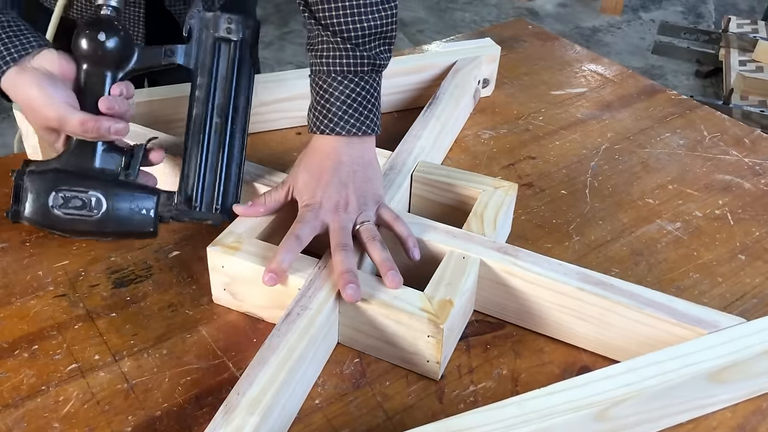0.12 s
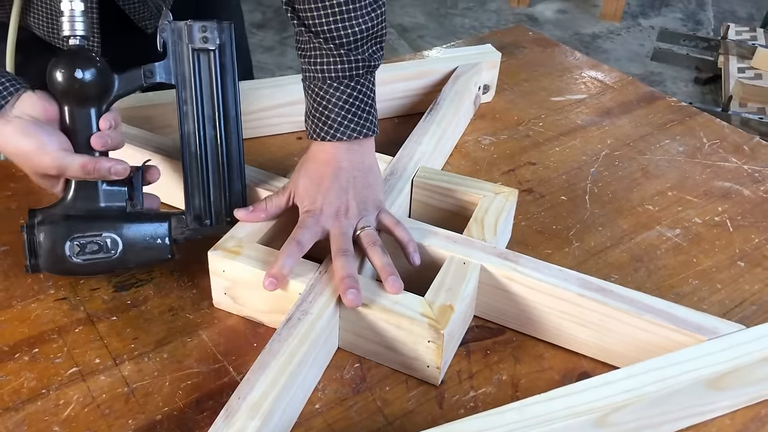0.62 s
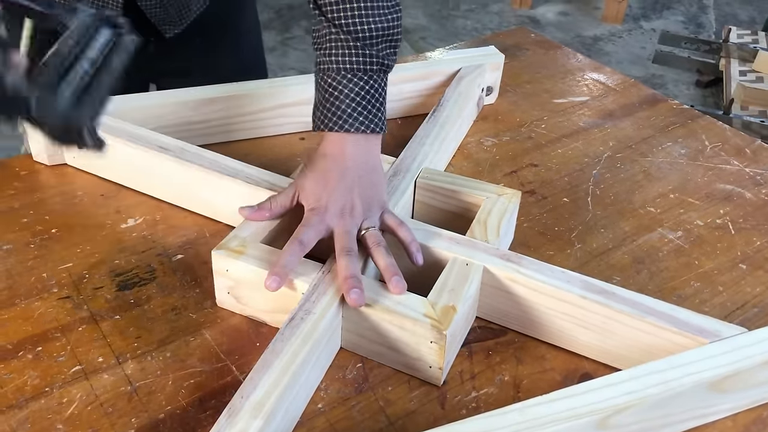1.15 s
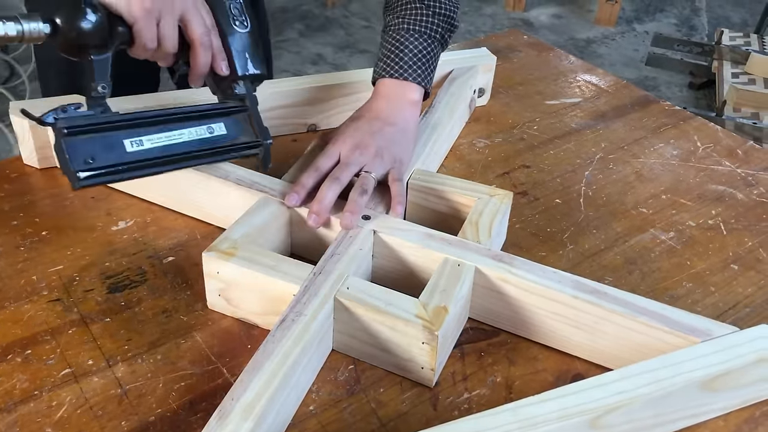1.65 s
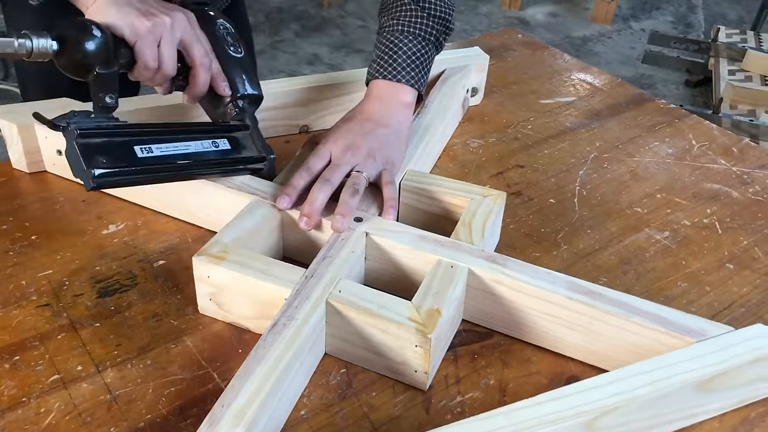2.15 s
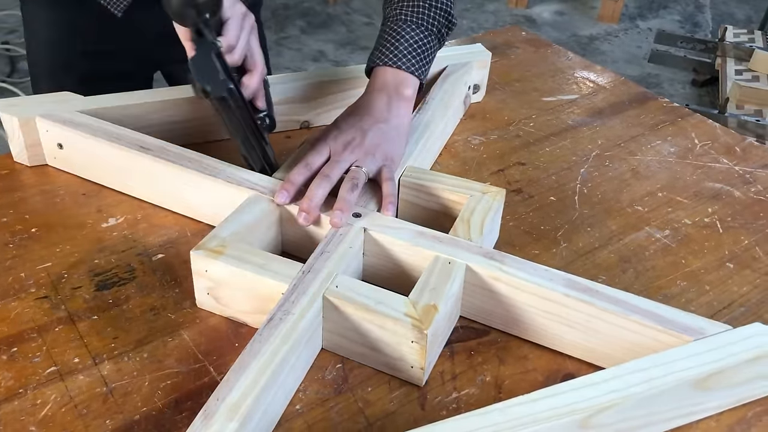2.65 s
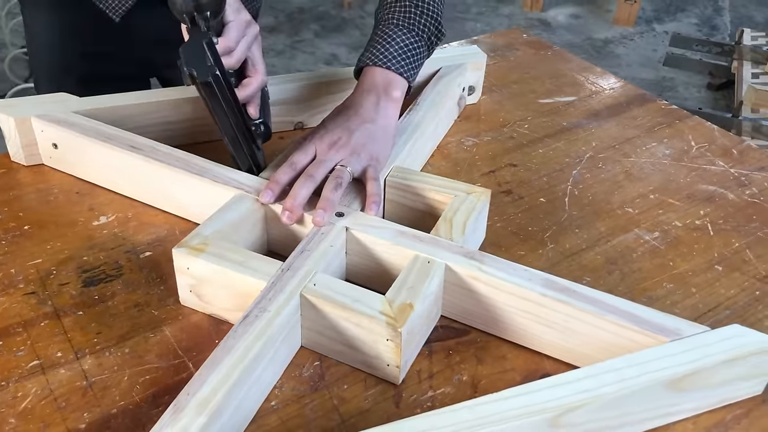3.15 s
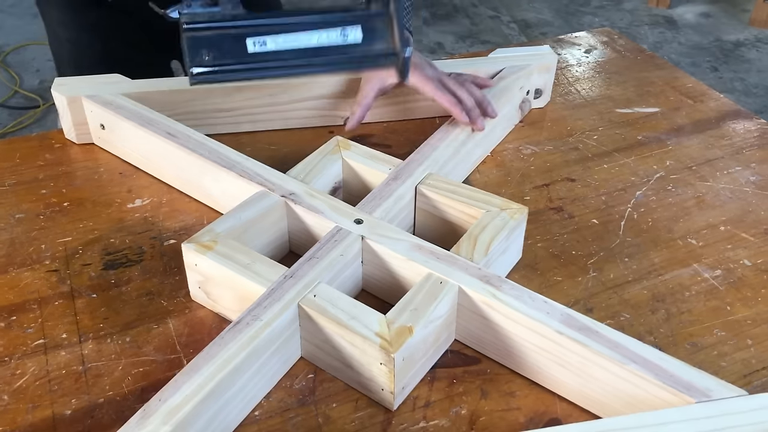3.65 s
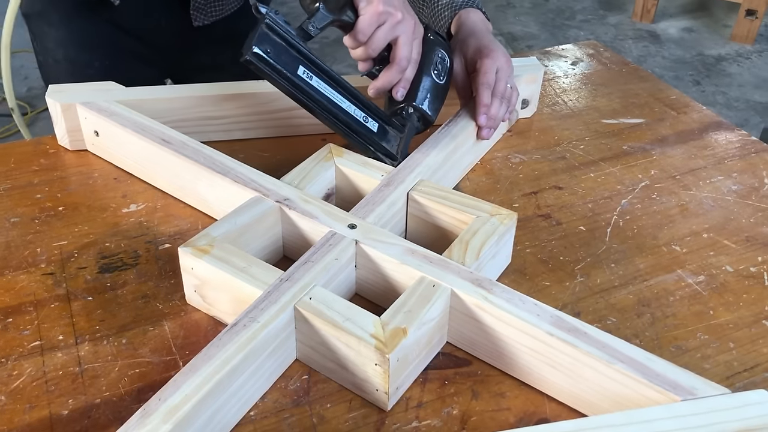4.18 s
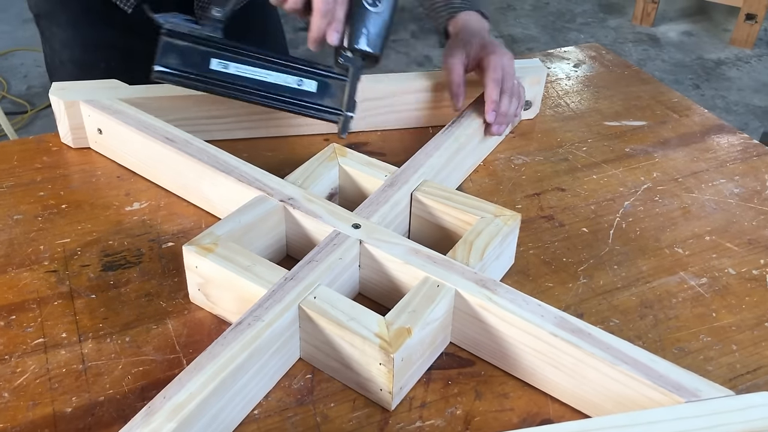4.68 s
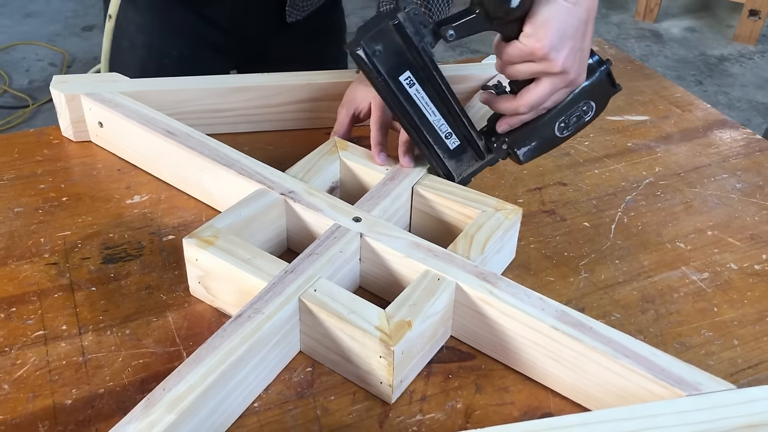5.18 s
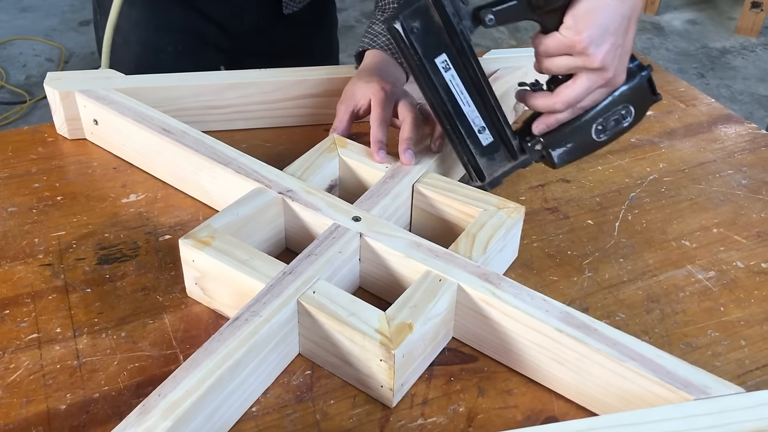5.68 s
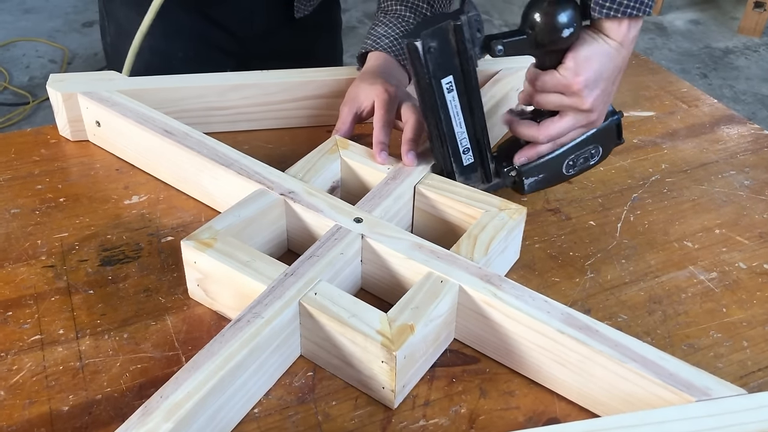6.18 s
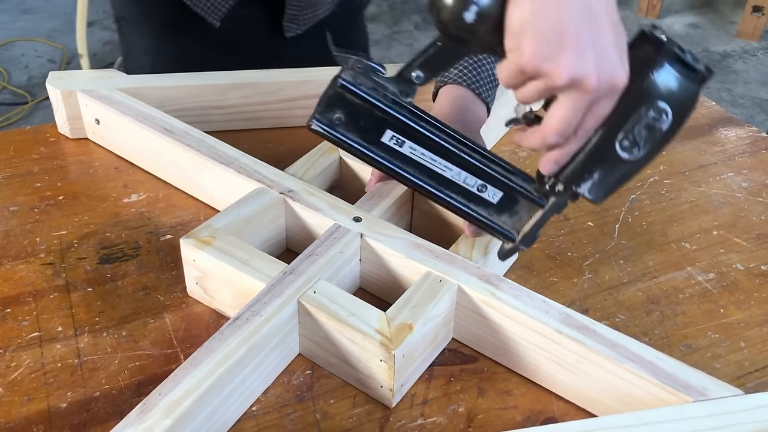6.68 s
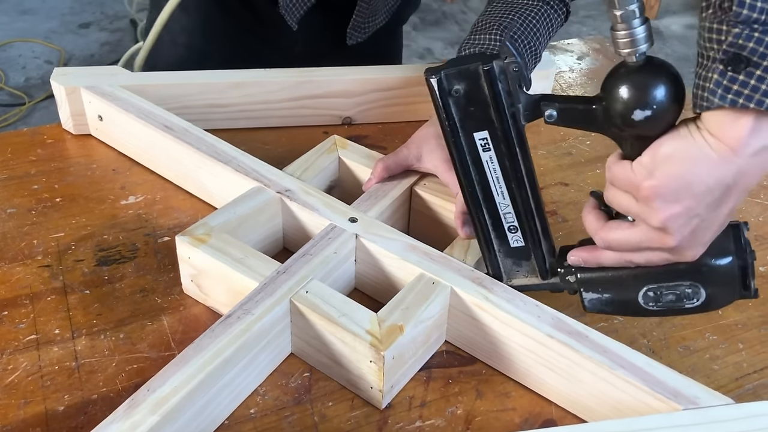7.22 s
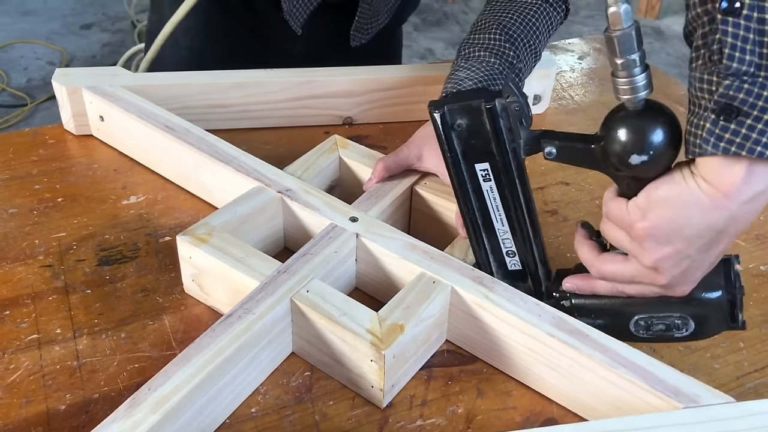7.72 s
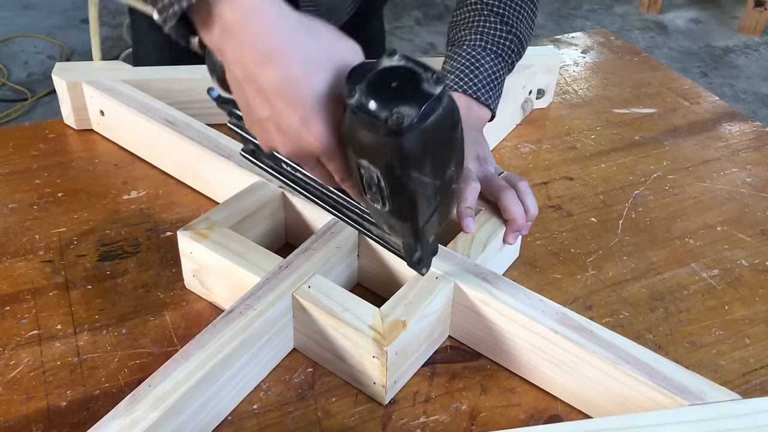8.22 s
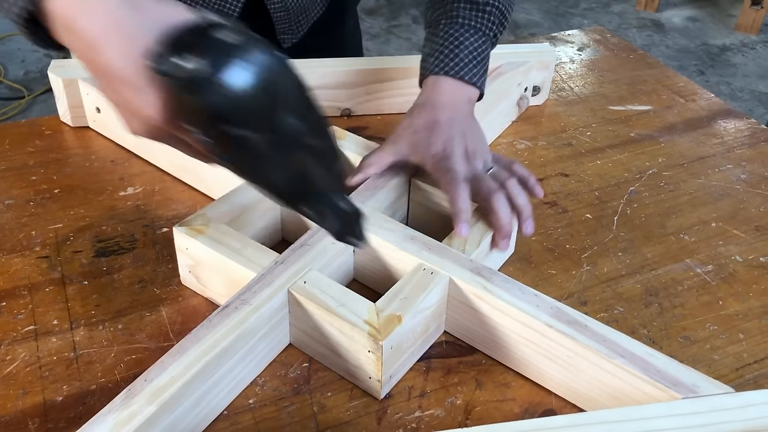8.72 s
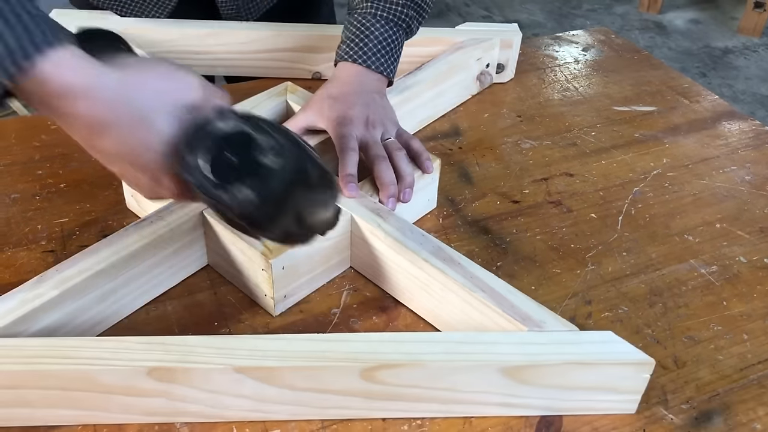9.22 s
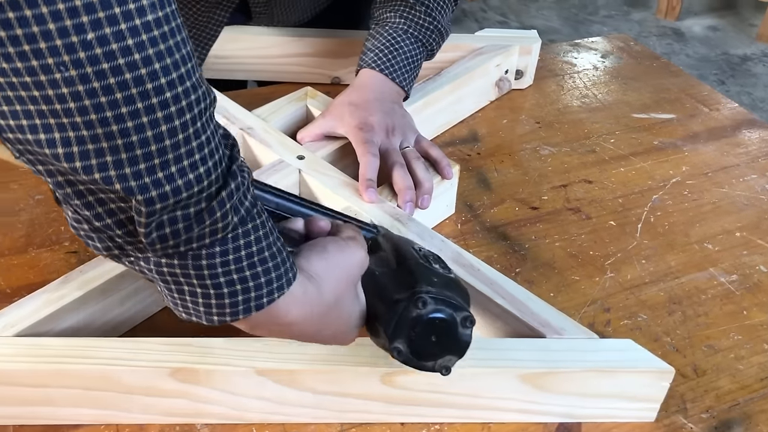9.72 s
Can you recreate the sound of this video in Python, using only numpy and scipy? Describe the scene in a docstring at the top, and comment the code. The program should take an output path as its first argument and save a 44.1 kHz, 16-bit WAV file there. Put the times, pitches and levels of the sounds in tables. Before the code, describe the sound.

Close to the microphone, an air nailer drives brads into a pine frame: each shot is a hard metallic crack with a burst of air, then a short exhaust puff. Between shots the gun clacks on wood and the frame thumps and slides on the bench. Distant bangs come around the middle. A large shed gives a short echo over a faint rustling background.

```python
"""Air nailer at a workshop bench

Near at hand, an air nailer drives brads into a pine frame: valve and exhaust blow shaped turbulent noise,
while steel, pine and bench answer each blow as sums of decaying modes.
Gun and frame knock and slide between shots, someone bangs further off, and there are ticks and tinkles.
A hall echoes by convolution with decaying noise, above a wavering shop background and a faint whine."""
import sys
import numpy as np
from scipy import signal
from scipy.fft import rfft, irfft
from scipy.io import wavfile
from scipy.ndimage import uniform_filter1d

SR = 44100
rng = np.random.default_rng(int(sys.argv[2]) if len(sys.argv) > 2 else 0)


def store_wav(level_fs):
    """Save 16-bit WAV to argv[1]."""
    pcm = np.round(np.clip(np.atleast_2d(level_fs), -1, 1) * 32767)
    wavfile.write(sys.argv[1], SR, pcm.T.astype(np.int16))


def volts_from_db(level):
    """Convert decibel levels to linear amplitude ratios."""
    exponent = np.asarray(level, float) / 20
    return 10 ** exponent


N = 434826
LEAD = 4096  # samples ahead of t = 0, for sounds that have already begun
PLACES = 5  # positions of the work, each with its own echo

# shots: faint hiss begins t/s, valve opens t/s, valve shuts t/s, air level/dB, hall level/dB, chatter level/dB
SHOTS = [(-.058, -.033, -.017, -28, 0, -33), (.847, .871, .890, -25, -1, -31),
         (2.190, 2.220, 2.236, -21.5, 0, -29), (3.256, 3.278, 3.294, -24.5, 2, -29.5),
         (4.476, 4.504, 4.524, -24, 1.5, -30.5), (5.588, 5.620, 5.633, -20, -3, -28.5),
         (6.183, 6.198, 6.210, -25, 2, -27), (7.226, 7.256, 7.266, -19.5, -5.5, -35),
         (7.845, 7.859, 7.880, -24, 1, -29.5), (8.591, 8.610, 8.622, -25.5, 1, -31.5)]
# exhaust port, venting as the piston returns:
# opens t/s, shuts t/s, level/dB, rise/ms, after-blow level/dB, after-blow fall/ms
EXHAUSTS = [(.052, .070, -18.5, 2, -5, 24), (.974, .996, -19.5, 8, -2.5, 25),
            (2.319, 2.337, -17, 2, -5, 26), (3.379, 3.402, -25, 3, 0, 20), (3.411, 3.421, -23, 2, -7, 18),
            (4.594, 4.611, -19.5, 1.5, -5.5, 17), (5.697, 5.712, -22, 5, -3.5, 15),
            (6.273, 6.285, -18, 2, -7, 14), (7.344, 7.361, -22, 8, -4, 18), (7.941, 7.956, -22, 3, -1, 14),
            (8.693, 8.712, -20, 2.5, -8, 14)]
# spectrum of the bright air jet: f/Hz, density level/dB per Hz
AIR_COLOUR = [(70, -42.5), (165, 0.5), (400, -4.5), (900, -10), (1700, -8), (4300, -6), (9000, -1),
              (15000, 3.5), (17000, -3)]
# driver hitting the brad, and gun rebounding: t/s, level/dB, relative crack level/dB
STRIKES = [(-.018, -20, -3), (.888, -9, -4), (.891, -18, 4), (.900, -19, -3), (2.230, -14, 6),
           (2.235, -16, 3), (3.294, -18, -7), (3.300, -18, 8), (3.318, -20, -5), (4.520, -15, -2),
           (4.539, -20, -10), (4.552, -16, -3), (5.626, -22, 7), (5.660, -22, -8), (6.213, -17, 5),
           (7.263, -27, 3), (7.275, -15, -3), (7.878, -19, 3.5), (7.898, -17, 3), (8.629, -13, 3)]
# modes of gun body and frame: f/Hz, level/dB, t60/s
GUN_MODES = [(205, -8, 0.027), (322, -14.5, .04), (885.6, -2, 0.054), (950, 5.5, 0.0086),
             (1144, 5.5, 0.011), (1460, -2.5, 0.044), (1653, 9.5, 0.0081), (1980, 6, 0.0075),
             (2660, -22, .012), (4112, 8.5, 0.004), (5300, -1, .015), (6480, -23, .012)]
# thumps of frame and hands on the bench: t/s, peak level/dB, pitch ratio
KNOCKS = [(.404, -44, .8), (1.268, -59, 1.01), (1.722, -31, .98), (1.906, -27, 1.08), (1.975, -38, 1.01),
          (2.487, -40, 1.23), (2.752, -33, 1.2), (2.969, -32.5, .76), (3.892, -41, 1.03),
          (4.084, -30.5, 1.3), (4.125, -33, 1.4), (5.133, -31.5, 1.06), (5.403, -35.5, 1.04),
          (6.697, -37.5, 1.01), (6.875, -32, .99), (6.947, -31.5, 1.01), (7.507, -38.5, 1.01),
          (8.376, -31, .89), (8.945, -49, 1.01), (8.975, -43, 1.01), (9.030, -31, .91), (9.054, -29, 1.01),
          (9.071, -26, 1.01), (9.100, -34, 1.01), (9.130, -38, 1.01), (9.293, -31, 1.1), (9.328, -33, 1.1),
          (9.501, -28, .96), (9.783, -36.5, 1.06)]
# modes of the bench top: f/Hz, level/dB, t60/s
BENCH_MODES = [(88, -12, .12), (112, -5.5, 0.06), (149, 4.5, 0.13), (173, -1, 0.033), (202.7, -0.5, 0.079),
               (258, 2, 0.13), (333, 2, .05)]
# clacks of the gun against the frame: t/s, peak level/dB, contact/ms, pitch ratio
CLACKS = [(1.502, -35, .1, 1.5), (1.53, -48, .3, .84), (1.572, -37, .19, 2.1), (1.906, -37.5, .22, 1.23),
          (2.488, -41.5, .28, .92), (2.755, -17.5, .15, .95), (2.972, -42, .3, 1.3), (3.67, -45, .3, .99),
          (3.893, -41, .4, .95), (4.085, -32, .6, 1.2), (4.128, -32, 1.1, .7), (4.159, -35, 1.1, .7),
          (5.138, -31.5, .41, .76), (5.4, -37.5, .33, 1.28), (6.874, -38, .26, 1.2), (6.947, -34, .2, 1.15),
          (8.299, -51, .3, 1.2), (8.378, -45, .3, .9), (8.981, -45, .6, 1.01), (9.032, -39, .8, .9),
          (9.093, -39.5, .5, .9), (9.251, -48.5, .3, 1.01), (9.501, -43, .34, .82), (9.784, -39.5, .3, .85)]
# modes of the pine frame: f/Hz, level/dB, t60/s
FRAME_MODES = [(360, -10.5, .025), (516, 2, .03), (630, 4.5, 0.043), (740, -1, 0.043), (811, -3, .025),
               (1014, -0.5, 0.019), (1290, -1, .025), (1646, -4, .02), (1950, -6.5, 0.015),
               (2500, -8.5, 0.013), (3653, -12, 0.008)]
# decay of the hall: f/Hz, t60/s
HALL_T60 = [(60, .5), (250, 0.21), (1000, 0.36), (4000, 0.26), (14000, 0.15)]
# shop background: t/s, rumble level/dB, rustle level/dB, hiss level/dB
SHOP = [(.3, -76, -78, -85), (.8, -67, -74, -80), (1.2, -78, -75, -81), (1.7, -67, -72, -75),
        (2.15, -60, -67.5, -72), (2.5, -62, -72, -78), (2.65, -66, -80, -85), (3.2, -62, -66, -73),
        (3.75, -71, -74, -86), (4.0, -73, -78, -83), (4.45, -64, -72, -72), (4.85, -72, -72, -78),
        (5.3, -61, -72, -78), (5.8, -76, -68, -80), (6.05, -66, -65, -72), (6.45, -74, -66, -76),
        (7.1, -61, -67, -77), (7.55, -70, -70, -85), (8.25, -64, -73, -85), (8.55, -62, -71, -76),
        (8.85, -76, -72, -90), (9.3, -66, -68, -73), (9.65, -61, -64, -79)]
# wood and gun sliding over bench and frame:
# start t/s, loudest t/s, fade/s, rumble level/dB, rustle level/dB, hiss level/dB
SLIDES = [(.41, .44, .06, -68, -70, -80), (1.33, 1.36, .1, -78, -64, -66), (1.48, 1.52, .06, -75, -60, -70),
          (2.74, 2.76, .08, -68, -60, -64), (2.92, 3.0, .12, -62, -60, -68),
          (3.68, 3.72, .03, -62, -80, -90), (4.07, 4.10, .08, -55, -60, -68),
          (4.17, 4.24, .09, -56, -60, -68), (6.86, 6.93, .06, -51, -57, -74),
          (7.56, 7.74, .1, -66, -59, -61), (7.76, 7.85, .03, -64, -58, -55),
          (8.36, 8.42, .05, -66, -62, -74), (8.95, 9.07, .07, -55, -55, -65),
          (9.425, 9.46, .06, -62, -46, -62), (9.72, 9.78, .15, -57, -54, -70)]
# spectra of the three background bands: f/Hz, density level/dB per Hz
RUMBLE = [(25, -18), (60, -5.5), (120, -2), (200, -2.5), (400, -14), (700, -43)]
RUSTLE = [(200, -35.5), (450, -2), (800, -1), (1500, -6.5), (2200, -11), (4500, -36)]
HISS = [(1500, -30.5), (2600, 6), (5000, -1), (9000, -5), (15000, -8.5), (17000, -16)]
# blows further off in the hall: t/s, level/dB, fall/ms, relative treble level/dB
FAR = [(.698, -57, 14, 5), (1.338, -49, 16, -14), (1.632, -53, 14, 2.5), (3.621, -49, 14, -6),
       (4.424, -54, 9, -3), (4.941, -50, 28, -2), (5.094, -35, 18, -4), (5.375, -46, 14, -30),
       (5.902, -31, 13, 1.5), (6.099, -26.5, 30, -3), (6.523, -30.5, 24, -2.5), (6.698, -22, 16.8, -3.5)]
# spectrum of their body: f/Hz, density level/dB per Hz
FAR_COLOUR = [(100, -15), (300, -6), (750, 2), (1800, 2.5), (2800, -4), (5000, -19), (16000, -23)]
# single notes that ring briefly, of wood or small parts:
# t/s, f/Hz before a common pitch ratio, starting level/dB, t60/s
TINKLES = [(.700, 2050, -60, .05), (1.343, 3750, -59, .19), (1.343, 4250, -62, .2), (1.385, 2550, -59, .2),
           (4.128, 1000, -40, .11), (4.159, 1040, -42, .11), (2.40, 2520, -54, .3)]
# dry little ticks: t/s, peak level/dB
TICKS = [(1.5723, -58), (1.9051, -59.5), (2.0662, -40.5), (2.7562, -28.5), (7.1202, -55), (9.2509, -54)]
# faint whine that climbs: t/s, f/Hz, level/dB
WHINE = [(5.199, 1230, -83), (5.279, 1272, -72.5), (5.37, 1302, -60), (5.449, 1380, -84), (5.55, 1390, -65),
         (5.62, 1400, -85.5)]
# brief dip of the level: start t/s, end t/s, gain/dB
LEVEL_DIP = (3.599, 3.621, -20.5)

# parts of a shot: rise/ms, fall/ms, relative dull level/dB, hall level/dB
LEAD_HISS, OPENING, LEAK = (9, 80, -8, -9), (9, 15, -9, -9), (3.5, 15, -18, 2)
ECHO_SWELL = (16, 30, -5, -6)
INLET = (4.5, 22, -7)  # each shot gives the hall level
VENT = (14, -13, -5)  # each exhaust gives the rise
AFTER_BLOW = (13, -7, -12)  # each exhaust gives the fall
LEAD_HISS_DB, LEAD_HISS_DB_PER_MS = -37, -.45  # a longer lead-in is fainter
OPENING_DB, LEAK_DB, LEAK_LEAD_S = -16, -10, .010  # valve and port leak a little before they open
SHUT_MS = 3.0  # time constant of a closing valve or port
ECHO_SWELL_DB = -4.5  # noise swell that carries part of the echo after each inlet
RECOIL_DB, FRAME_DB = -17, -14  # bench and frame under a strike, relative to it
RETURN_DB, RETURN_LAG_S = -14, .008  # thump of the returning piston, relative to the exhaust
CHATTER_RISE_MS, CHATTER_FALL_MS, FAR_CHATTER_DB = 14, 32, -23
STRIKE_HALL_DB, KNOCK_HALL_DB, CLACK_HALL_DB, FAR_HALL_DB = -3, -5.5, -12, -1.5
KNOCK_CONTACT_MS = 2.4
HALL_GAP_S, HALL_RISE_S = 0.014, 0.011
NEAR_SHARE = 0.45  # gain for echoes of near things, before the walls answer
SIDE_DB = -19.5


def colour(count, points):
    """Spectral shaping: white noise filtered to (Hz, dB) points and scaled to rms 1."""
    hz, db = np.transpose(points)
    f = np.maximum(np.arange(count // 2 + 1) * SR / count, 1)
    gain = volts_from_db(np.interp(np.log(f), np.log(hz), db, left=-90))
    x = irfft(rfft(rng.standard_normal(count)) * gain, count)
    return x / x.std()


def flicker(rate, depth_db):
    """Random amplitude modulation: the gain in dB glides between random levels, rate of them a second."""
    k = int(SR / rate)
    steps = np.repeat(rng.standard_normal((N + LEAD) // k + 1), k)[:N + LEAD]
    return volts_from_db(depth_db * uniform_filter1d(steps, k))


def lines():
    """Superposition buses: an empty direct line, and a hall line for each place the work moves to."""
    return np.zeros((1 + PLACES, N + LEAD))


def add(bus, s, sound, hall_db):
    """Superposition: adds a sound to the direct line and, at hall_db, to the hall line of its place."""
    i = int(round(s * SR)) + LEAD
    sound = sound[:bus.shape[1] - i]
    place = int(s * 3 + 1) % PLACES  # moves on three times a second
    bus[0, i:i + len(sound)] += sound
    bus[1 + place, i:i + len(sound)] += sound * volts_from_db(hall_db)


def swell(rise_ms, fall_ms):
    """Transient envelope: quadratic rise, then exponential relaxation."""
    ms = np.arange(int(.2 * SR)) * 1000 / SR
    rise = np.minimum(ms / max(rise_ms, .1), 1) ** 2
    return rise * np.exp(-np.maximum(ms - rise_ms, 0) / max(fall_ms, .3))


def ring(modes, share, scatter_db):
    """Modal superposition: decaying sines whose strengths scatter by the given dB."""
    hz, db, t60 = np.transpose(modes)[:, :, None]
    t = np.arange(int(.3 * SR)) / SR
    # above 800 Hz neighbouring modes start in opposite sense
    sense = np.where(hz > 800, (-1) ** np.arange(len(modes))[:, None], 1)
    decay = volts_from_db(db + scatter_db[:, None] - 60 * t / t60)
    return np.sum(sense * decay * np.sin(2 * np.pi * hz * share * t), axis=0)


def peak(x, db):
    """Linear scaling of a sound to a peak level."""
    return x * volts_from_db(db) / np.abs(x).max()


def blows(table, modes, scatter_db):
    """Impact excitation: a half-sine push drives the modes; a longer, softer contact sounds duller."""
    bus = lines()
    # each blow lands elsewhere, so the strengths of its modes differ
    chance = rng.standard_normal((len(table), len(modes)))
    for (s, db, contact_ms, share, hall_db), c in zip(table, chance):
        push = np.sin(np.linspace(0, np.pi, int(np.clip(contact_ms, .05, 8) * SR / 1000) + 3))
        blow = signal.fftconvolve(ring(modes, share, scatter_db * c), push)
        add(bus, s, peak(blow, db), hall_db)
    return bus


def bursts():
    """Gated noise: faint lead-in, valve opening, inlet, echo swell; exhaust leak, vent, after-blow."""
    for lead_s, open_s, shut_s, db, hall_db, _ in SHOTS:
        lead_ms = 1000 * (open_s - lead_s)
        yield lead_s, open_s, LEAD_HISS_DB + LEAD_HISS_DB_PER_MS * lead_ms, LEAD_HISS
        yield open_s - LEAK_LEAD_S, open_s, db + OPENING_DB, OPENING
        yield open_s, shut_s, db, (*INLET, hall_db)
        yield shut_s, np.inf, db + hall_db + ECHO_SWELL_DB, ECHO_SWELL
    for open_s, shut_s, db, rise_ms, after_db, fall_ms in EXHAUSTS:
        yield open_s - LEAK_LEAD_S, open_s, db + LEAK_DB, LEAK
        yield open_s, shut_s, db, (rise_ms, *VENT)
        yield shut_s, np.inf, db + after_db, (AFTER_BLOW[0], fall_ms, *AFTER_BLOW[1:])


def air():
    """Turbulent jet noise: a bright hiss and a duller, slower-falling part, spitting unevenly."""
    bright, dull = lines(), lines()
    ms = np.arange(int(.2 * SR)) * 1000 / SR
    for s, end_s, db, (rise_ms, fall_ms, dull_db, hall_db) in bursts():
        shut = np.exp(-np.maximum(ms - 1000 * (end_s - s), 0) / SHUT_MS)
        add(bright, s, volts_from_db(db) * shut * swell(rise_ms, fall_ms), hall_db)
        add(dull, s, volts_from_db(db + dull_db) * shut * swell(rise_ms, 1.3 * fall_ms), hall_db)
    spit = flicker(700, 3.5)
    dull_colour = [(300, -11), (1000, -3), (2800, -3.5), (7000, -6), (12000, -21.5)]
    return spit * (bright * colour(N + LEAD, AIR_COLOUR) + dull * colour(N + LEAD, dull_colour))


def strikes():
    """Impact of steel on steel: the body's modes ring briefly under a broadband crack."""
    bus = lines()
    chance = rng.standard_normal((len(STRIKES), len(GUN_MODES) + 1))
    cracks = rng.standard_normal((len(STRIKES), int(.2 * SR)))
    for (s, db, crack_db), c, crack in zip(STRIKES, chance, cracks):
        body = ring(GUN_MODES, 1 + .015 * c[0], 3.0 * c[1:])
        add(bus, s, peak(body, db), STRIKE_HALL_DB)
        add(bus, s, volts_from_db(db + crack_db - 6) * crack * swell(.2, .8), STRIKE_HALL_DB - 3)
    return bus


def bench_thumps():
    """Modal response of the bench top to knocks, recoil and the returning piston."""
    recoils = [(s, db + RECOIL_DB, 1) for s, db, _ in STRIKES]
    returns = [(s + RETURN_LAG_S, db + RETURN_DB, 1) for s, _, db, *_ in EXHAUSTS]
    thumps = KNOCKS + recoils + returns
    rows = [(s, db, KNOCK_CONTACT_MS, share, KNOCK_HALL_DB) for s, db, share in thumps]
    return blows(rows, BENCH_MODES, scatter_db=4.0)


def frame_clacks():
    """Modal response of the pine frame to short contacts with the gun and to each strike."""
    clacks = CLACKS + [(s, db + FRAME_DB, .8, .9) for s, db, _ in STRIKES]
    return blows([(*row, CLACK_HALL_DB) for row in clacks], FRAME_MODES, scatter_db=3.3)


def chatter():
    """Random impulse excitation: irregular taps of very different sizes drive the modes of the strike."""
    gate = lines()
    near = [(shut_s, db) for _, _, shut_s, *_, db in SHOTS]
    far = [(s, db + FAR_CHATTER_DB) for s, db, *_ in FAR]
    for s, db in near + far:
        add(gate, s, volts_from_db(db) * swell(CHATTER_RISE_MS, CHATTER_FALL_MS), -6)
    taps = (rng.random(N + LEAD) < 900 / SR) * rng.standard_normal(N + LEAD)  # about 900 a second
    taps = taps * volts_from_db(3.0 * rng.exponential(size=N + LEAD))
    body = ring(GUN_MODES, 1, np.zeros(len(GUN_MODES)))[:int(.05 * SR)]
    body = body / np.sqrt(np.sum(body ** 2))
    return signal.fftconvolve(gate * taps / taps.std(), body[None])[:, :N + LEAD]


def hall():
    """Reverberation of a large shed: weak near echoes, a rise as far walls answer, then banded decay."""
    t = np.arange(int(.7 * SR)) / SR
    hz, t60 = np.transpose(HALL_T60)
    echoes = rfft(rng.standard_normal(len(t)))
    octave = np.log2(np.maximum(np.arange(len(echoes)) * SR / len(t), 1) / 62.5)
    out = 0
    for k in range(9):
        # overlapping octaves that add up to an even spectrum
        band = irfft(echoes * np.interp(octave, np.arange(9), np.arange(9) == k), len(t))
        band_t60 = np.interp(np.log(62.5 * 2 ** k), np.log(hz), t60)
        out = out + band * volts_from_db(-60 * t / band_t60)
    out = out * np.clip((t - HALL_GAP_S) / HALL_RISE_S, NEAR_SHARE, 1)
    return out / np.sqrt(np.sum(out ** 2))


def shop():
    """Band noise: wavering rumble, rustle and hiss, to which the friction of sliding adds power."""
    t = np.arange(N) / SR
    s, *levels = np.transpose(SHOP)
    gains = np.array([volts_from_db(np.interp(t, s, db)) for db in levels])
    for start, top, fade, *dbs in SLIDES:
        moving = np.clip((t - start) / max(top - start, .005), 0, 1)
        moving = moving * np.exp(-np.maximum(t - top, 0) / fade)
        gains = np.hypot(gains, np.outer(volts_from_db(np.array(dbs)), moving))
    shapes = (RUMBLE, RUSTLE, HISS)
    return sum(g * flicker(30, 3.2)[:N] * colour(N, shape) for g, shape in zip(gains, shapes))


def far_blows():
    """Shaped noise: far blows as short noise bursts with a body and a treble part."""
    body, top = lines(), lines()
    for s, db, fall_ms, treble_db in FAR:
        add(body, s, volts_from_db(db - 5) * swell(6.0, fall_ms), FAR_HALL_DB)
        add(top, s, volts_from_db(db - 8.5 + treble_db) * swell(2.5, fall_ms), FAR_HALL_DB)
        # a soft noise lead-in precedes each blow
        add(top, s - .022, volts_from_db(db - 26.5 + treble_db) * swell(12, 33), -20)
    return flicker(400, 2.5) * (body * colour(N + LEAD, FAR_COLOUR) + top * colour(N + LEAD, HISS))


def tinkles():
    """Damped oscillation: single notes that ring briefly, of wood or small parts, one sine each."""
    bus = lines()
    for s, hz, db, t60 in TINKLES:
        add(bus, s, ring([(hz, db, t60)], 0.99, np.zeros(1)), -6)
    return bus


def ticks():
    """Broadband transients: differenced noise, rich in treble, under a very short envelope."""
    bus = lines()
    clicks = np.diff(rng.standard_normal((len(TICKS), int(.2 * SR) + 1)))
    for (s, db), click in zip(TICKS, clicks):
        add(bus, s, peak(click * swell(.3, 1.5), db), -12)
    return bus


def whine():
    """Frequency modulation: a sine whose phase integrates the climbing frequency."""
    t = np.arange(N) / SR
    s, hz, db = np.transpose(WHINE)
    phase = 2 * np.pi * np.cumsum(np.interp(t, s, hz)) / SR
    return volts_from_db(np.interp(t, s, db, left=-140, right=-140)) * np.sin(phase)


def scene():
    """Superposition, nearly mono: the channels differ only in direct air, strikes and far blows."""
    loud = air() + strikes() + far_blows()
    direct, *sends = loud + chatter() + bench_thumps() + frame_clacks() + ticks() + tinkles()
    echo = sum(signal.fftconvolve(send, hall())[LEAD:N + LEAD] for send in sends)
    echo = echo * flicker(80, 2.2)[:N]  # the echo wavers at random
    # a short random smear makes the two channels differ slightly in loud direct sounds
    smear = rng.standard_normal(128) / np.sqrt(128)
    side = volts_from_db(SIDE_DB) * signal.fftconvolve(loud[0], smear)[LEAD:N + LEAD]
    return direct[LEAD:] + echo + shop() + whine() + side * np.array([[1], [-1]])


def roll_off(x):
    """The treble ends steeply here."""
    return signal.sosfilt(signal.butter(12, 16820, fs=SR, output="sos"), x)


def record(dry):
    """Linear filtering: the level dips briefly, then the top and the deep bass are cut."""
    t = np.arange(N) / SR
    start, end, db = LEVEL_DIP
    dip = uniform_filter1d(1. * ((t > start) & (t < end)), size=88)  # edges of 2 ms
    x = dry * volts_from_db(db * dip)
    x = signal.sosfilt(signal.ellip(10, .3, 60, 15900, fs=SR, output="sos"), x)
    # the small microphone loses the deep bass
    x = signal.sosfilt(signal.butter(2, 76., "high", fs=SR, output="sos"), x)
    return roll_off(x)


dry = scene()
out = record(dry)
store_wav(out)
```